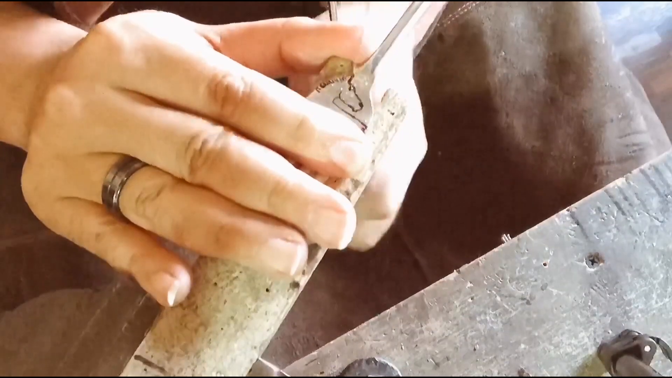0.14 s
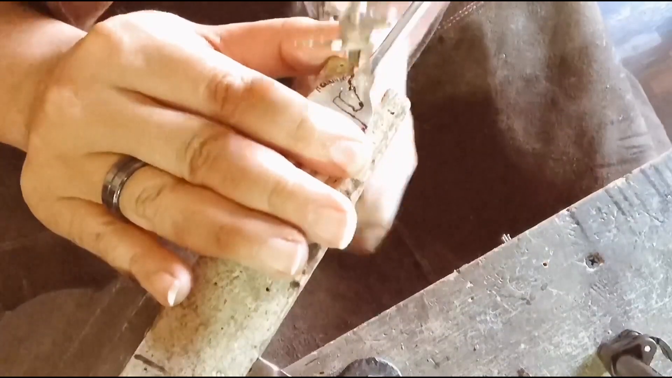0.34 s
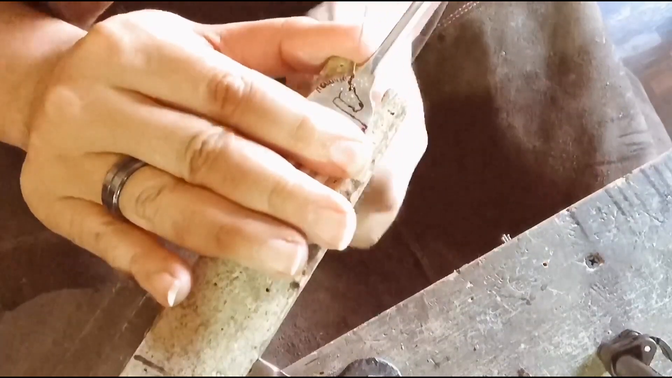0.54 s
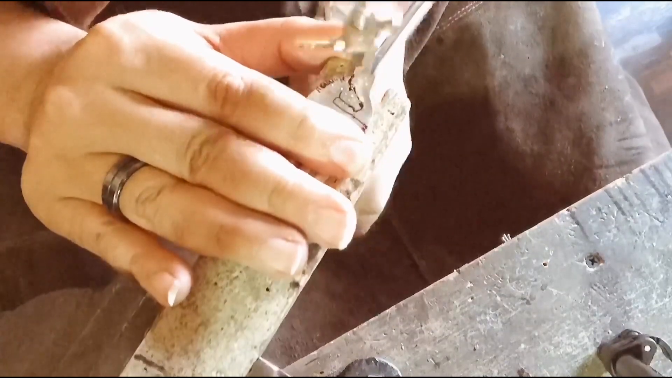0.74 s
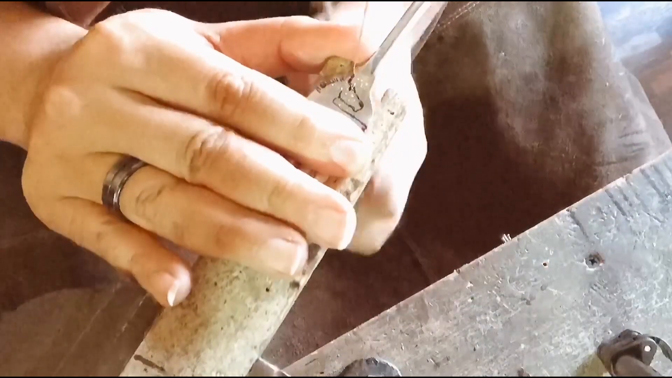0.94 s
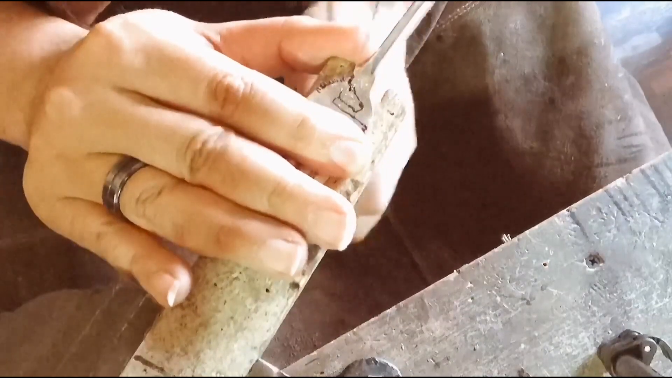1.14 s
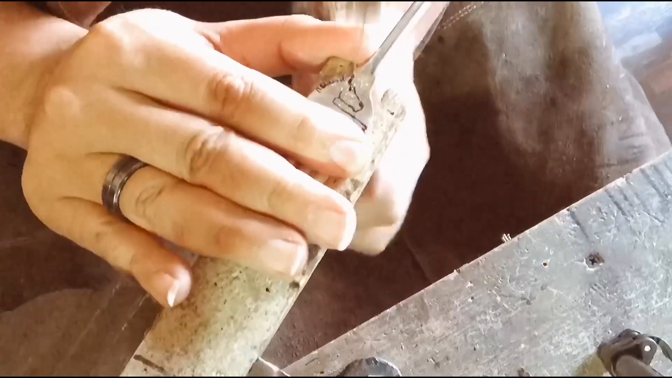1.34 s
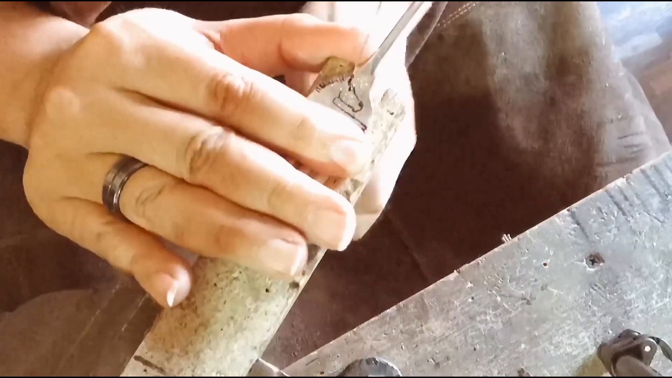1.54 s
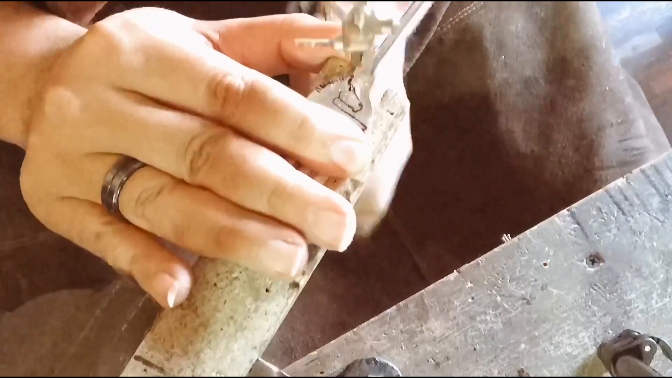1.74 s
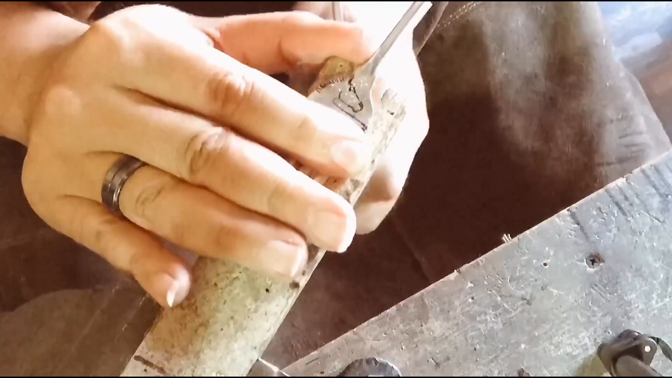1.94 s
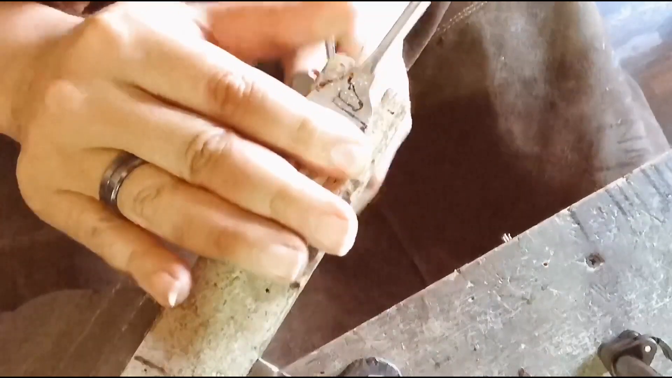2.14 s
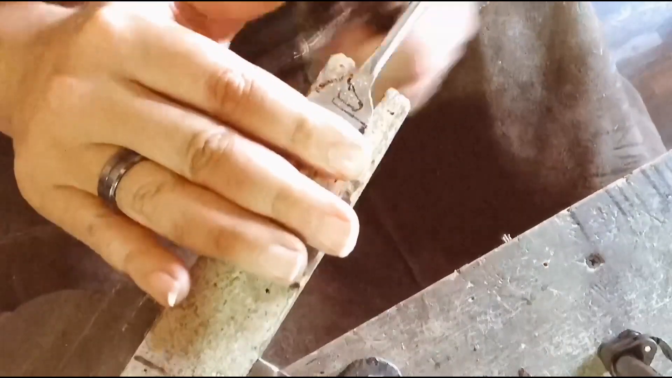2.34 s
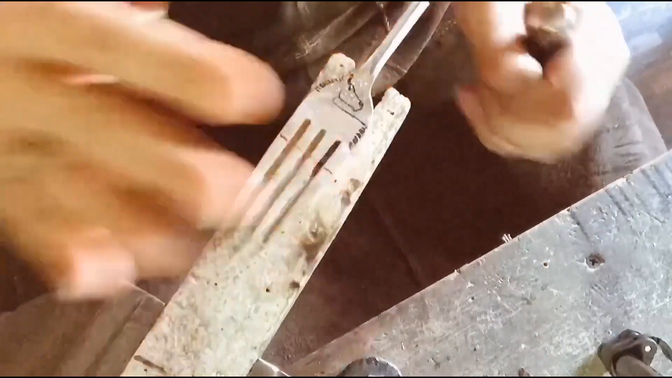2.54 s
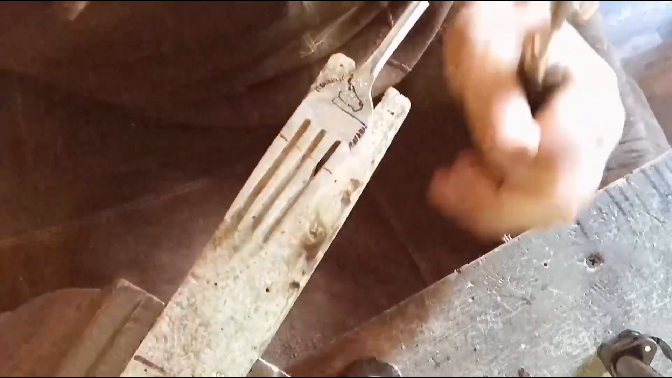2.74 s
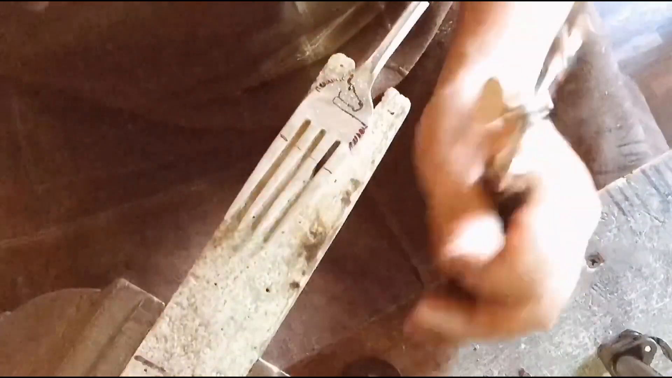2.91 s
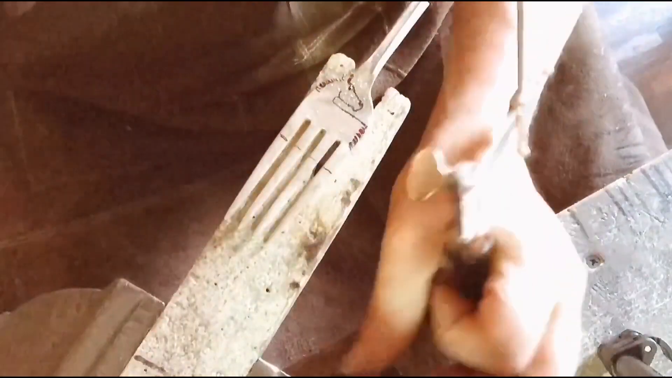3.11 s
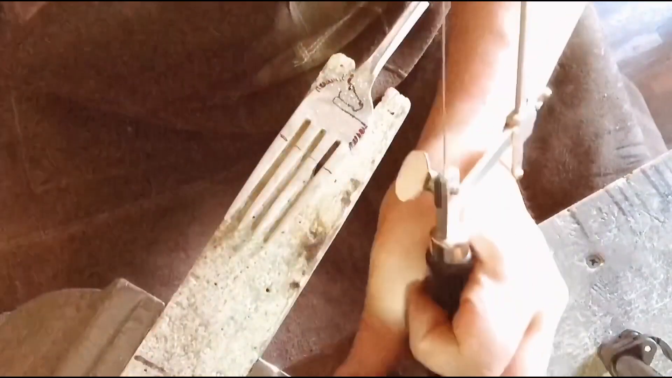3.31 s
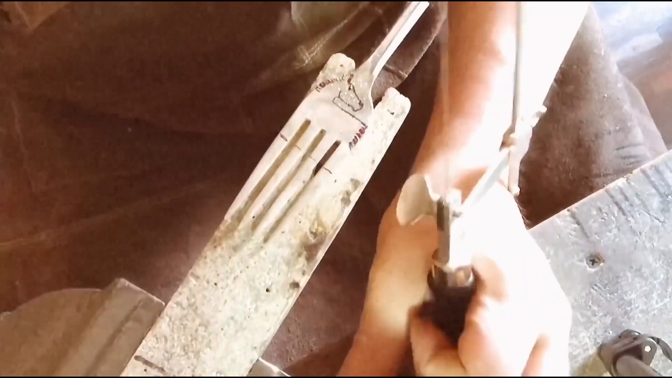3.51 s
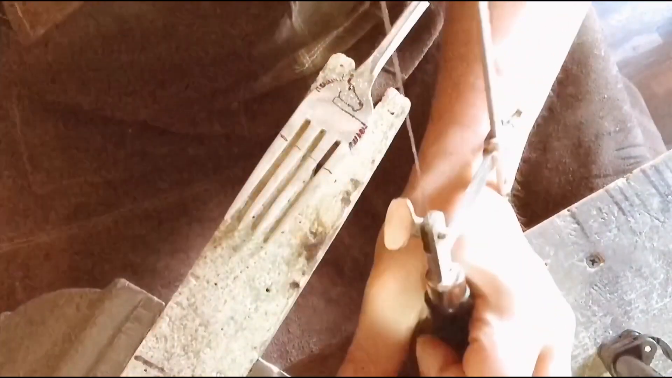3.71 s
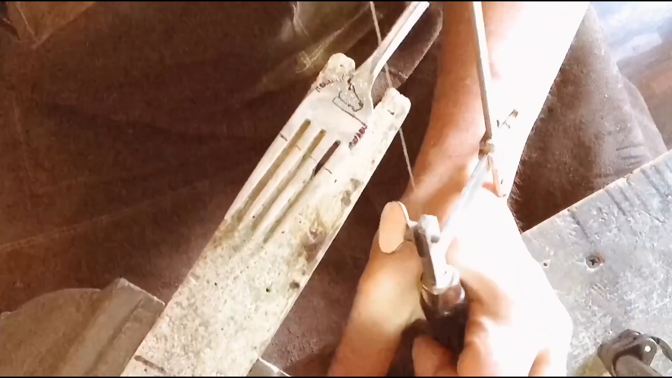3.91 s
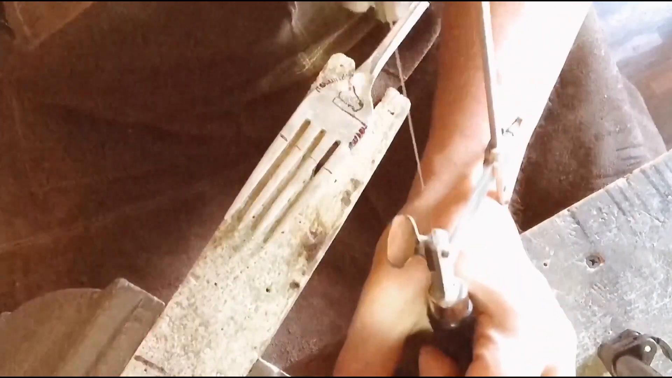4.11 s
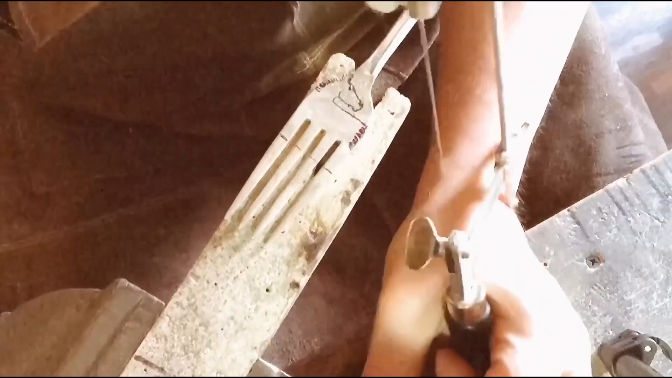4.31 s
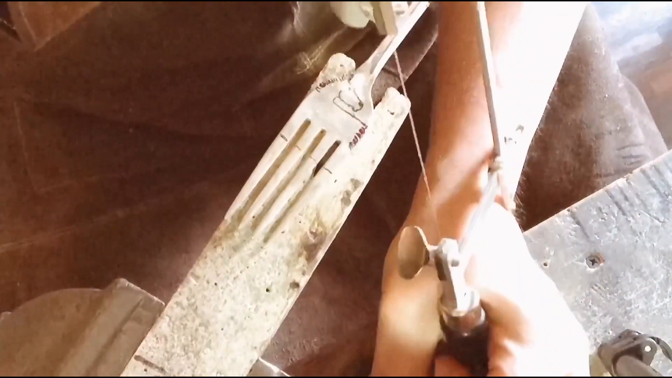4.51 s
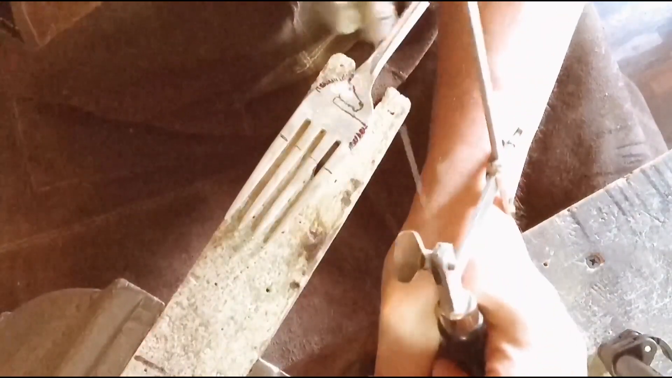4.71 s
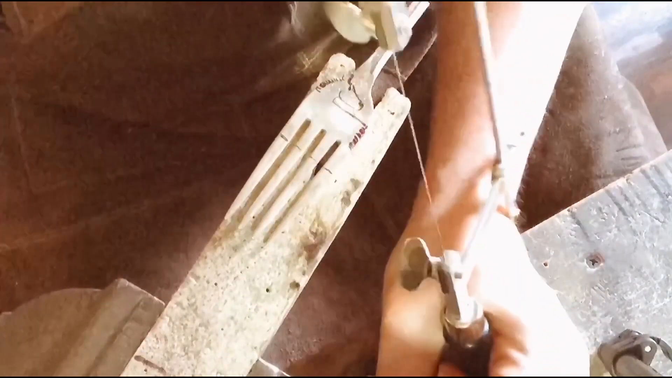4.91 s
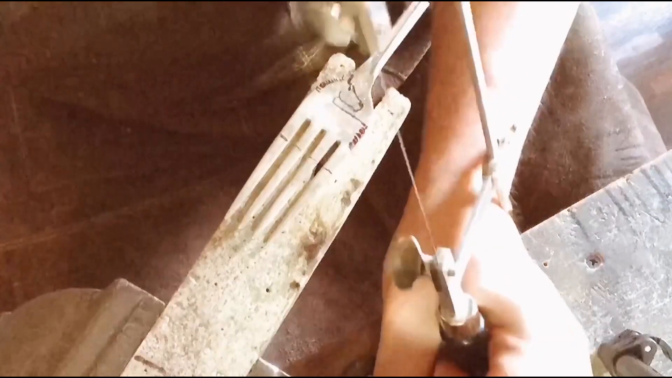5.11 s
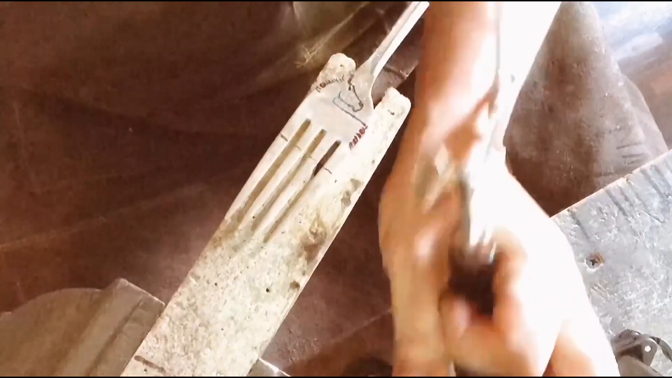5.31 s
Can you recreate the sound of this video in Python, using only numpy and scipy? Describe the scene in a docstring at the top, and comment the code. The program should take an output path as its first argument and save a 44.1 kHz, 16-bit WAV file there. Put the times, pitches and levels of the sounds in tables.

```python
"""A fine saw blade rasps up and down through a metal fork held on a wooden bench pin, jams and is drawn out.
Its teeth are random catches that ring fork, blade, wood and pin; the fork slaps the pin as strokes turn.
The freed fork chatters, ringing from quick ticks. Then hands shift the saw frame: clicks and knocks are
bursts of noise that die away, rubbing and rustles are fine grit, squeaks are narrowly filtered noise.
Behind it a quiet workshop: shaped noise for air, sine waves for hum."""
import sys
import numpy as np
from scipy import signal
from scipy.fft import rfft, irfft
from scipy.io import wavfile
from scipy.ndimage import uniform_filter1d

SR = 44100
rng = np.random.default_rng(int(sys.argv[2]) if len(sys.argv) > 2 else 0)


def bounce(signal):
    """Save signal as a 16-bit WAV file at the path given by the first command-line argument."""
    frames = np.transpose(np.atleast_2d(signal))
    limited = np.clip(frames, -1, 1)
    pcm = np.round(limited * 32767).astype(np.int16)
    wavfile.write(sys.argv[1], SR, pcm)


N = 235960  # length [samples]

# What the metal fork rings with: (frequency [Hz], width [Hz], relative level [dB])
FORK_MODES = [(1586, 4.7, 1.5), (1742, 7.7, -9.5), (2237, 180, -6), (3040, 26, -18), (3890, 69, -19.5),
              (4144, 90, -10)]
# What blade and frame ring with: (frequency [Hz], width [Hz], relative level [dB])
BLADE_MODES = [(6320, 120, -14), (6828, 190, -2), (7030, 51, 2.5), (7580, 120, -9.5), (9400, 170, -9),
               (10190, 170, -9.5), (13700, 250, -18.5)]
# Body of pin and bench: (frequency [Hz], width [Hz], relative level [dB])
WOOD_MODES = [(418, 12, -13.5), (516.4, 39, 1), (644, 93, 0), (643.5, 27, -11), (964, 47, -5.5),
              (1175, 16, -5.5), (1537, 56, -1)]
# Bending of the bench pin: (frequency [Hz], width [Hz], relative level [dB])
PIN_MODES = [(143.6, 45, -7.5), (218.2, 16.4, 7)]
# Rasp between the fork's modes, blade going up or down: (frequency [Hz], relative level [dB])
RASP_UP_CURVE = [(710, -17.5), (1200, -3), (1350, -7.5), (1830, -9), (2210, 0), (3270, -15), (4010, -18),
                 (6000, -46.5), (7800, -50.5), (13200, -120)]
RASP_DOWN_CURVE = [(710, -19.5), (1200, -5), (1360, -11), (1560, -8), (1880, -9.5), (2230, 0), (2940, -12),
                   (6000, -22), (7800, -47), (13200, -120)]
# Hiss of the blade, going up or down: (frequency [Hz], relative level [dB])
SHEEN_UP_CURVE = [(2650, -46.5), (4500, -0.5), (5070, -6), (5860, -11.5), (6540, 2), (6950, -7.5),
                  (7400, -5.5), (8780, -16), (9940, -10), (12000, -20.5), (14000, -24), (15500, -35)]
SHEEN_DOWN_CURVE = [(2650, -35), (4500, -2), (5890, -4.5), (6990, 1), (7480, -5.5), (8080, -6), (8740, -9),
                    (9890, -4.5), (10700, -11), (11600, -10), (13900, -19.5), (15500, -30)]


def saw():
    """Teeth catch on the cut in a dense uneven pattern that rings fork, blade, wood and pin."""
    going_up, bite_db, sheen_db, wood_db, pin_db = stroke_levels()
    teeth = grit(3500, 2.1, 0.91, .006)
    chips = grit(5000, 2.2, 1.9, .008)

    rasp = np.where(going_up, colour(teeth, RASP_UP_CURVE), colour(teeth, RASP_DOWN_CURVE))
    fork = evened(ring(teeth, FORK_MODES, shifty_db=5.5) + gain_of(5.0) * rasp)

    sheen_up = colour(chips + 0.16 * teeth, SHEEN_UP_CURVE)
    sheen_down = colour(chips + 0.36 * teeth, SHEEN_DOWN_CURVE)
    sheen = np.where(going_up, sheen_up, sheen_down)
    blade_ring = ring(teeth, BLADE_MODES, shifty_db=4.0)
    blade = evened(gain_of(np.where(going_up, -1.2, -4.0)) * blade_ring + sheen)

    # A broad resonance first keeps wood and pin in their own range
    wood = ring(ring(teeth, [(730, 550, 0)]), WOOD_MODES, shifty_db=1.0)
    pin = ring(ring(teeth, [(200, 130, 0)]), PIN_MODES)
    shake = uniform_filter1d(gain_of(pin_db), int(0.012 * SR))  # the heavy pin follows slowly
    return gain_of(bite_db) * fork + gain_of(sheen_db) * blade + gain_of(wood_db) * wood + shake * pin


CATCH_DB = -8  # how far below full bite a stroke begins
SHEEN_LAG_S = 0.0081  # the hiss catches more slowly than the bite
SLOW_DB_PER_S, TURN_DB = 520.5, 29  # first rate of the drop as the blade turns, and the most it drops
OUT_DB_PER_S = 197  # fade once the blade is out
WOOD_FOLLOWS, PIN_FOLLOWS = .4, 0.12  # share of the stroke's shape, in dB, that reaches wood and pin
BITE_WAVER_DB, WOOD_WAVER_DB, PIN_WAVER_DB = 0.63, 0.5, 4.6  # the pressure of the hand wavers
# Wood and pin fall quiet as the hand pauses before the next stroke: (after down, after up)
PAUSE_S, PAUSE_DB = 0.018, (-11.5, -2.5)
# Strokes of the blade, down and up in turn; the twelfth jams, the last two draw the blade out:
# (start [s], catch time constant [s], time it begins to slow [s], bite level [dB],
#  bite swell along the stroke [dB], hiss relative to bite [dB], wood level [dB],
#  shake of the pin [dB], pin swell along the stroke [dB])
STROKE_TABLE = [(-.05, 0.0061, 0.066, -37, -6.5, -11, -41, -38, -3.5),
                (0.11, 0.015, 0.22, -35.5, 3.5, -8, -46.5, -40, 3),
                (0.286, 0.004, 0.4, -35.5, 0.5, -9, -48, -47.5, -6),
                (0.47, 0.0031, 0.58, -35.5, -0.5, -9.5, -47, -40, 11),
                (0.628, 0.0072, 0.75, -38.5, 7.5, -9, -46, -40.5, -3),
                (.812, 0.0099, 0.94, -35.5, -4.5, -9, -43, -41, 8),
                (0.978, .006, 1.103, -38, 6, -9.5, -44.5, -46.5, -3),
                (1.183, 0.0017, 1.292, -34.5, -4, -10, -43, -41, 5),
                (1.335, 0.0057, 1.46, -38.5, 6.5, -10, -45.5, -44, -1.5),
                (1.535, 0.0028, 1.63, -35, 0.5, -10, -45.5, -43, 1),
                (1.69, 0.0043, 1.818, -39, 8, -9, -51, -51, 1),
                (1.848, 0.0042, 1.855, -49, 1, -11, -43.5, -37.5, -2),
                (1.93, 0.006, 2.025, -53, -4, 1.5, -57, -58, 1),
                (2.044, 0.0244, 2.239, -71.5, -19, 1.5, -74, -75.5, 3)]
# Swell of the wood along each stroke, one value a stroke: (swell [dB])
WOOD_SWELLS = [-4.5, 4, -1.5, -1, -2, 1, 0, 3.5, -4.5, -1, 7, -2, 4, -1]


def stroke_levels():
    """Levels in dB of bite, hiss, wood and pin: each stroke catches, holds with a swell, then slows."""
    t = np.arange(N) / SR
    starts = np.transpose(STROKE_TABLE)[0]
    which = np.searchsorted(starts, t, "right") - 1
    (start, catch, slows, bite_db, swell_db,
     sheen_db, wood_db, pin_db, pin_swell_db) = np.transpose(STROKE_TABLE)[:, which]
    going_up = which % 2 == 1
    age = t - start
    left = np.append(starts[1:], np.inf)[which] - t
    along = np.minimum(age / (slows - start), 1) - .5

    slowing = TURN_DB * np.tanh(SLOW_DB_PER_S * np.maximum(t - slows, 0) / TURN_DB)
    held = swell_db * along - slowing
    shape = held + CATCH_DB * np.exp(-age / catch)
    sheen_shape = held + CATCH_DB * np.exp(-age / (catch + SHEEN_LAG_S))

    out_fade = -OUT_DB_PER_S * np.maximum(t - STROKE_TABLE[-1][2], 0)
    waver = BITE_WAVER_DB * drift(0.017) + out_fade
    pause = np.take(PAUSE_DB, which % 2) * np.exp(-(left / PAUSE_S) ** 2) + out_fade

    wood_swell = np.take(WOOD_SWELLS, which) * along
    wood = wood_db + wood_swell + WOOD_FOLLOWS * shape + pause + WOOD_WAVER_DB * drift(.025)
    pin = pin_db + pin_swell_db * along + PIN_FOLLOWS * shape + pause + PIN_WAVER_DB * drift(0.034)
    return going_up, bite_db + shape + waver, bite_db + sheen_db + sheen_shape + waver, wood, pin


# The fork slaps the pin as the stroke turns:
# (time [s], crack level [dB], thump relative to crack before a trim [dB], crack centre [Hz],
#  crack decay scale [s], length of the shove [s])
SLAP_TABLE = [(0.29, -35.5, -1.5, 1800, 0.047, 0.018), (.631, -28.5, -6, 1760, 0.06, .03),
              (.978, -26, -6, 1760, 0.053, .03), (1.338, -26.5, -6, 1523, 0.051, .025),
              (1.845, -29.5, -2.5, 1300, 0.12, .045)]
# Pin and bench under a slap, damped by the hand: (frequency [Hz], width [Hz], relative level [dB])
THUD_MODES = [(140.5, 40, 2.5), (212, 140, -4), (365, 110, -5), (500, 88, -8), (640, 55, -7.5)]


def slaps():
    """A broad crack, while a short noisy shove makes the pin and bench thud."""
    cracks, push = np.zeros(N), np.zeros(N)
    for s, db, thump_db, hz, decay_s, shove_s in SLAP_TABLE:
        add(cracks, s, burst(db, hz, 1.0, 0.84, decay_s, 0.00034))
        length = int(shove_s * SR)
        swell = np.sin(np.pi * np.linspace(0, 1, length) ** 0.63) ** 2
        shove = swell * rng.standard_normal(length)
        add(push, s, gain_of(db + thump_db) * evened(shove))
    thud = ring(ring(push, [(266.3, 730, 0)]), THUD_MODES)
    return cracks + gain_of(-2.5) * np.sqrt(np.mean(push ** 2)) * thud


# The freed fork chatters on the pin: (time [s], relative blow strength [dB])
CHATTER_TABLE = [(2.378, -26), (2.386, -25.5), (2.392, -31), (2.396, -31.5), (2.409, -29.5), (2.413, -34.5),
                 (2.426, -31), (2.433, -30.5), (2.452, -31), (2.464, -36.5), (2.479, -35.5), (2.488, -34),
                 (2.504, -54)]
# What the loose fork rings with: (frequency [Hz], width [Hz], relative level [dB])
LOOSE_MODES = [(860, 480, -9), (1262, 155, 9), (1655, 380, 3.5), (3060, 230, 5.5), (3900, 324, -1),
               (5000, 450, -6)]


def chatter():
    """Each bounce is a few quick ticks that ring the loose fork; hard blows are short and bright."""
    blows = np.zeros(N)
    t = np.arange(int(0.032 * SR)) / SR
    for s, db in CHATTER_TABLE:
        tick_here = rng.random(len(t)) < .06
        ticks = rng.standard_normal(len(t)) * tick_here * gain_of(-8.5 - 60 * t / 0.0604)
        ticks[0] = 1
        contact = np.hanning(int(0.00034 * SR * gain_of(-.45 * (db + 21.5))) + 3)
        add(blows, s, gain_of(db) * np.convolve(ticks, contact / np.linalg.norm(contact)))
    soft = signal.lfilter(*signal.butter(3, 5000, fs=SR), blows)
    return gain_of(10.0) * np.sqrt(np.mean(blows ** 2)) * ring(soft, LOOSE_MODES)


# Clicks of the saw frame, fork and bench:
# (time [s], level [dB], centre [Hz], reach below [octaves], reach above [octaves],
#  decay scale [s], rise scale [s])
CLICK_TABLE = [(1.988, -42.5, 2100, 0.67, 1.6, 0.1, 0.0013), (2.362, -63.5, 3900, 1.1, 0.11, 0.14, 0.0025),
               (2.381, -47.5, 1370, 2.1, 1.03, 0.41, 0.0035), (2.5, -53, 1110, 0.69, 0.26, 0.13, 0.0021),
               (2.708, -61.5, 3486, 0.28, 0.53, 0.057, 0.0024),
               (2.776, -47.5, 1254, 0.084, 0.096, 0.098, 0.0098),
               (2.799, -63.5, 1900, 0.073, 0.042, 0.15, 0.0035),
               (3.007, -57.5, 3400, 1.23, 0.64, 0.37, 0.0013), (3.242, -51, 1590, 0.7, 0.59, 0.13, 0.0014),
               (3.389, -51, 3720, 0.105, 0.184, 0.1, 0.00048), (3.552, -49, 1280, 0.53, 0.85, 0.16, 0.0024),
               (3.569, -47, 1510, 0.71, 0.26, 0.09, 0.0026), (3.757, -36.5, 3545, 1.02, 2.6, 0.15, 0.0055),
               (3.813, -36.5, 2790, 0.8, 0.8, 0.15, 0.022), (3.902, -56, 1400, 0.38, 0.54, 0.16, 0.00165),
               (4.02, -55, 606, 0.6, 0.67, 0.11, 0.0009), (4.085, -61, 1300, 0.51, 0.41, 0.31, .008),
               (4.141, -56.5, 1250, 2, 0.33, 0.068, 0.0035), (4.326, -62, 1390, 0.1, 0.035, 0.099, 0.0012),
               (4.419, -52.5, 2980, 0.524, 0.61, 0.16, 0.0061),
               (4.485, -58, 1383, 0.24, 0.61, 0.11, 0.0017), (4.659, -71, 3320, 0.58, 0.56, 0.18, 0.0076),
               (4.931, -69.5, 2087, 0.073, 0.11, 0.17, 0.0015),
               (4.985, -54.5, 4530, 0.75, 0.49, 0.37, 0.031),
               (5.018, -30.5, 5120, 0.89, 0.42, 0.065, 0.00085),
               (5.029, -36, 2200, 0.27, 0.76, 0.075, 0.0019),
               (5.045, -48.5, 4360, 1.7, 0.65, 0.077, 0.0038),
               (5.331, -40, 5740, 0.253, 0.18, 0.062, 0.005)]
# Dull knocks of the hand on wood: (time [s], level [dB], centre [Hz], decay scale [s])
KNOCK_TABLE = [(2.061, -66, 570, 0.35), (2.151, -52.5, 633, 0.08), (2.185, -58, 596, 0.22),
               (2.333, -62, 593, 0.097), (2.654, -59.5, 665, 0.11), (2.825, -57.5, 660, 0.11),
               (2.849, -58, 660, 0.12), (2.936, -60.5, 613, 0.088), (3.024, -64, 590, 0.12),
               (3.194, -64, 517, 0.24), (3.258, -56, 596, 0.17), (3.45, -67, 633, 0.16),
               (3.7, -69, 580, 0.47), (4.265, -64.5, 599, 0.15), (4.586, -58.5, 624, 0.18),
               (4.609, -59, 674, 0.11), (4.961, -58.5, 593, 0.132)]
# Skin and metal rubbing: (time [s], rub level [dB], low scuff level [dB])
RUBBING_TABLE = [(1.9, -70, -61), (2.05, -62.5, -62.5), (2.18, -61, -70), (2.4, -107, -66.5),
                 (2.49, -72.5, -70), (2.7, -82, -77), (3.061, -80, -79.5), (3.25, -76, -75),
                 (3.56, -96, -89), (3.85, -75, -72), (3.97, -86, -84.5), (4.11, -75, -85),
                 (4.56, -103, -75.5), (5.1, -108, -86), (5.35, -72.5, -79)]
# What the rubbing rings with: (frequency [Hz], width [Hz], relative level [dB])
RUB_MODES = [(1800, 62, -5), (2200, 260, 5.5), (2770, 11, 5.5), (3290, 110, 3), (4000, 47, -8.5),
             (4250, 180, -3.5), (5310, 35, -5), (5020, 53, -17), (6880, 150, -33.5), (1300, 230, -4.5),
             (5860, 620, -12.5)]
# Short fine rustles, perhaps of cloth: (peak time [s], time until 10 dB down [s], peak level [dB])
RUSTLE_TABLE = [(2.44, .04, -71), (2.57, .07, -80), (2.705, .022, -71), (2.858, .028, -70),
                (3.245, .025, -83), (4.092, .05, -85)]


def handling():
    """Blows make clicks and knocks; fine grit makes the rubbing, scuffing and rustling around them."""
    hits = np.zeros(N)
    t = np.arange(N) / SR
    for s, *blow in CLICK_TABLE:
        add(hits, s, burst(*blow))
    for s, db, hz, decay_s in KNOCK_TABLE:
        add(hits, s, burst(db, hz, 0.18, 0.12, decay_s, 0.0026))

    rub_db, scuff_db = curves([(1.85, -110, -110)] + RUBBING_TABLE)  # silent until the hand moves
    rub = ring(grit(6500, 2.6, 2.3, 0.009), RUB_MODES, shifty_db=5.5)
    scuff = ring(ring(grit(1100, 2.4, 2.6, 0.014), [(589, 200, 0)]), [(589, 200, 0)])

    puffs = sum(gain_of(db - 10 * ((t - s) / span) ** 2) for s, span, db in RUSTLE_TABLE)
    rustle_curve = [(6000, -24), (9000, -10.5), (11500, -2.5), (14000, -5), (15500, -14.0)]  # (Hz, dB)
    rustle = colour(grit(6000, 2.5, 1.54, 0.011), rustle_curve)
    return hits + gain_of(rub_db) * rub + gain_of(scuff_db) * scuff + puffs * rustle


# Thin squeaks of the frame sliding in the hand:
# (time [s], length [s], frequency [Hz], width of each filter pass [Hz], level [dB])
SQUEAK_TABLE = [(2.256, 0.06, 1870, 150, -79.5), (2.433, 0.064, 4360, 150, -68.5),
                (2.638, 0.17, 4400, 153, -78.5), (3.052, 0.3, 2300, 250, -71.5),
                (3.118, .12, 1658, 200, -73), (3.122, 0.16, 2893, 150, -73), (3.186, 0.059, 4280, 150, -79),
                (3.199, 0.093, 1397, 500, -71), (3.299, 0.11, 5600, 150, -82.5),
                (4.011, 0.36, 4700, 500, -89), (4.028, .12, 2500, 1210, -74.5),
                (4.125, 0.26, 6831, 120, -89), (4.319, .4, 1300, 200, -76.5), (4.497, 0.11, 2200, 200, -83),
                (5.202, 0.05, 9500, 1200, -85)]


def squeaks():
    """Each slide drives one narrow resonance unevenly for a moment."""
    out = np.zeros(N)
    grip = gain_of(2.0 * drift(.012))
    for s, length, hz, width, db in SQUEAK_TABLE:
        slide = rng.standard_normal(int(length * SR))
        for _ in range(2):  # two passes narrow the tone
            slide = signal.lfilter(*signal.iirpeak(hz, hz / width, SR), slide)
        add(out, s, gain_of(db) * evened(slide) * signal.windows.tukey(len(slide), .6))
    return out * grip


AIR_DB = -73.5  # overall level of the room air
WHINE_HZ = 419.5  # the strongest hum tone
# Tone of the room air: (frequency [Hz], relative level [dB])
AIR_CURVE = [(18, -62.5), (30, -27.5), (97, 0), (243, -1.5), (399, -17), (480, -22.5), (997, -21.5),
             (1200, -20), (1360, -16), (2020, -31.5), (2490, -22), (3150, -24.5), (5750, -30),
             (11000, -37.5), (12500, -56), (15500, -54.5)]
# Steady mains hum: (frequency [Hz], rms level [dB])
HUM_TONES = [(118.4, -81), (301.5, -82.5), (360.7, -84)]
# The strongest hum tone fades: (time [s], rms level [dB])
WHINE_LEVELS = [(1.9, -67), (2.55, -70.5), (2.7, -77), (5.35, -76.5)]


def workshop():
    """Room air is shaped noise; the faint mains hum is a few sine waves."""
    t = np.arange(N) / SR
    hum = sum(gain_of(db) * np.sin(2 * np.pi * (hz * t + rng.random())) for hz, db in HUM_TONES)
    whine_db, = curves(WHINE_LEVELS)
    hum = hum + gain_of(whine_db) * np.sin(2 * np.pi * WHINE_HZ * t)
    air = colour(rng.standard_normal(N), AIR_CURVE)
    return gain_of(AIR_DB) * air + np.sqrt(2) * hum  # root 2 turns rms into sine height


def room(x, t60):
    """Short diffuse tail off bench and walls: sparse random echoes that fall 60 dB in t60 seconds."""
    t = np.arange(int(.3 * SR)) / SR
    echoes = rng.choice([-1., 1.], len(t)) * (rng.random(len(t)) < .05)
    tail = echoes * gain_of(-60 * t / t60) * (t > .004)
    tail = signal.lfilter([1], [1, -.5], tail)  # softens the treble
    return signal.oaconvolve(x, tail / np.linalg.norm(tail))[:N]


def burst(db, hz, below, above, decay_s, rise_s):
    """A blow sets off a dense, uneven crowd of modes around hz; the high ones die sooner."""
    t = np.arange(int(.4 * SR)) / SR
    f, frame_s, noise = signal.stft(rng.standard_normal(len(t)), SR, nperseg=256, noverlap=192)
    octave = np.log2((f[:, None] + 1) / hz)
    away = octave / np.where(octave < 0, below, above)
    skirts = gain_of(-31.5 - 9.9 * abs(octave))  # faint, beside the main band
    bell = gain_of(-4.3 * away ** 2) + skirts
    bell = bell * gain_of(3.21 * rng.standard_normal(octave.shape))  # some modes stand out
    tilt = gain_of(-60 * frame_s / decay_s * 0.42 * np.clip(octave, -1, 3))
    shaped = noise * bell * tilt / np.sqrt(np.mean(bell ** 2))
    crowd = signal.istft(shaped, SR, nperseg=256, noverlap=192)[1][:len(t)]
    fade_db = 60 * (0.84 * t / decay_s + 0.43 * (t / decay_s) ** 2)  # the hand damps the tail ever faster
    attack = 1 - np.exp(-(t / (rise_s + 1e-4)) ** 1.5)
    return gain_of(db - fade_db) * crowd * attack


def grit(per_s, spread_db, throb_db, throb_s):
    """Random catches of uneven size whose force throbs."""
    size = gain_of(spread_db * np.minimum(rng.exponential(1, N), 3)) * rng.choice([-1., 1.], N)
    catches = rng.random(N) < per_s / SR
    return evened(size * catches * gain_of(throb_db * drift(throb_s)))


def ring(x, modes, shifty_db=0):
    """Passes x through two-pole resonances; a moving contact drives each one unevenly."""
    out = 0
    for k, (hz, width, db) in enumerate(modes):
        b, a = signal.iirpeak(hz, hz / width, SR)
        driven = x * gain_of(shifty_db * drift(0.028))
        out = out + (-1) ** k * gain_of(db) * signal.lfilter(b, a, driven)
    return evened(out)


def colour(x, points):
    """Shapes x by a spectrum joined on a log-frequency axis, then scales it to rms 1."""
    f, db = np.transpose(points)
    hz = np.fft.rfftfreq(len(x), 1 / SR)
    shape_db = np.interp(np.log(hz + 1), np.log(f + 1), db)
    return evened(irfft(rfft(x) * gain_of(shape_db), len(x)))


def drift(s):
    """Smooth random curve of rms 1 that changes over about s seconds."""
    frames = N // 64 + 2  # one point every 64 samples
    span = int(s * SR / 64) + 1
    slow = uniform_filter1d(uniform_filter1d(rng.standard_normal(frames), span), span)
    return np.interp(np.arange(N) / 64, np.arange(frames), evened(slow))


def curves(rows):
    """Columns of a curve table, sample by sample."""
    s, *columns = np.transpose(rows)
    return [np.interp(np.arange(N) / SR, s, c) for c in columns]


def add(mix, s, sound):
    """Mixes a sound in at time s."""
    part = mix[round(s * SR):][:len(sound)]
    part += sound[:len(part)]


def evened(x):
    """Scales to rms 1."""
    return x / np.sqrt(np.mean(x ** 2) + 1e-20)


def gain_of(db):
    """dB to gain."""
    return 10 ** (np.asarray(db) / 20)


def scene():
    """Everything close by, a little room, and the workshop air."""
    near = saw() + slaps() + chatter() + handling() + squeaks()
    return (near + gain_of(-14) * room(near, 0.16) + workshop())[None]


EDGE_HZ = 15700  # upper band limit


def record(dry):
    """The microphone loses the deep bass; then a filter removes everything above the band limit."""
    thin = signal.sosfilt(signal.butter(2, 100, "high", fs=SR, output="sos"), dry)
    band_limit = signal.firwin(511, EDGE_HZ, window=("kaiser", 9), fs=SR)
    return signal.oaconvolve(thin, band_limit[None], "same")


dry = scene()
out = record(dry)
bounce(out)
```